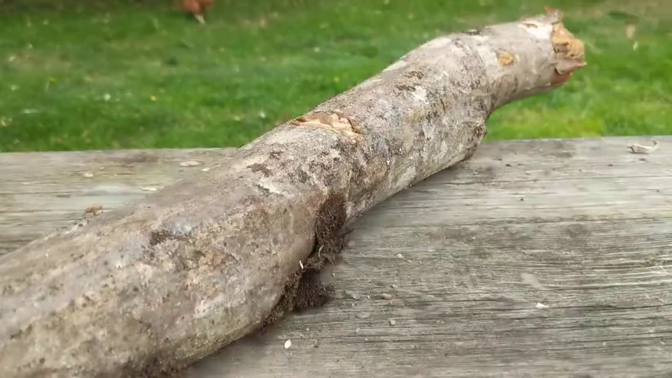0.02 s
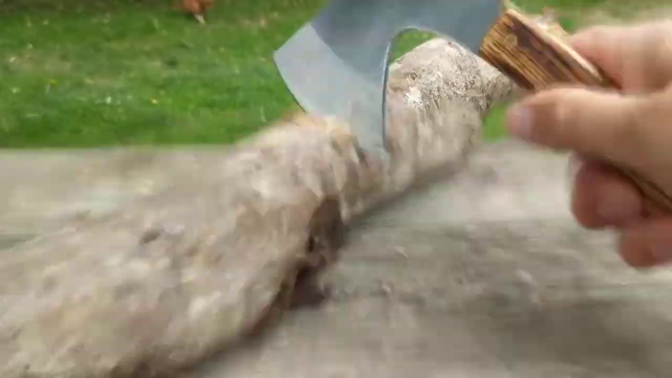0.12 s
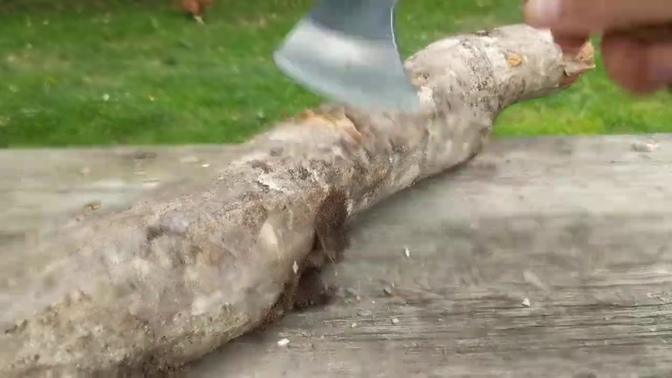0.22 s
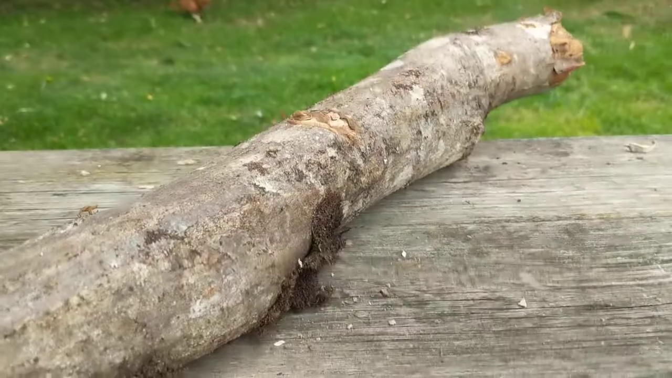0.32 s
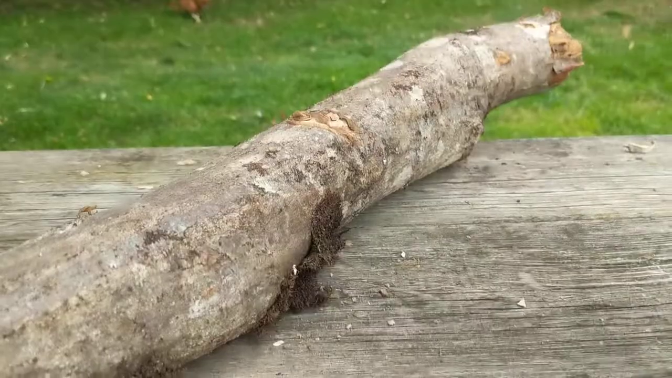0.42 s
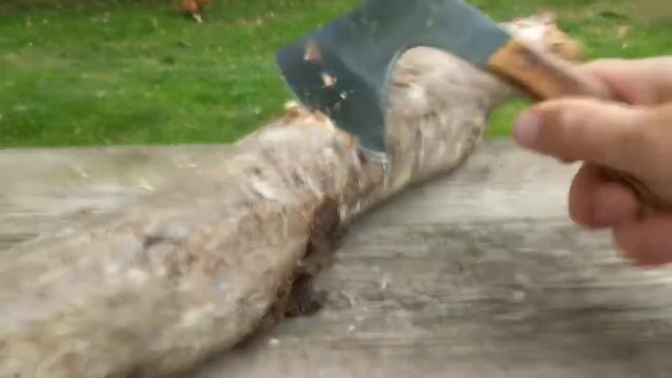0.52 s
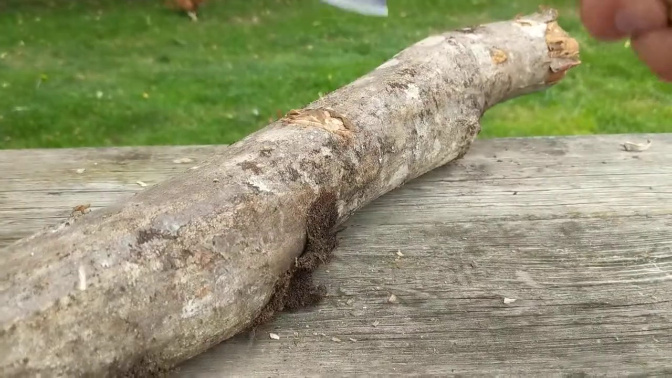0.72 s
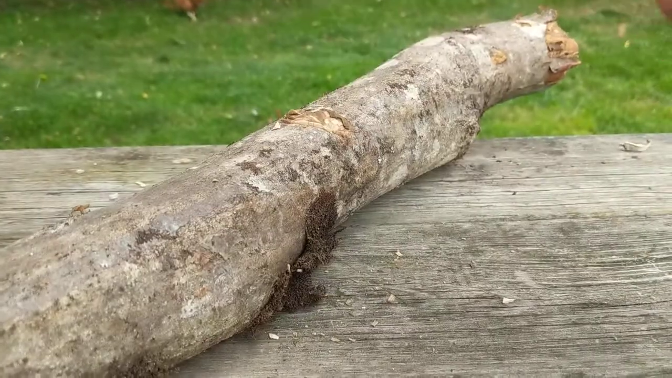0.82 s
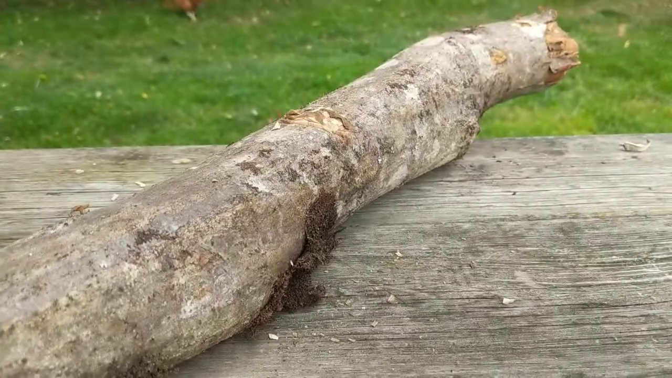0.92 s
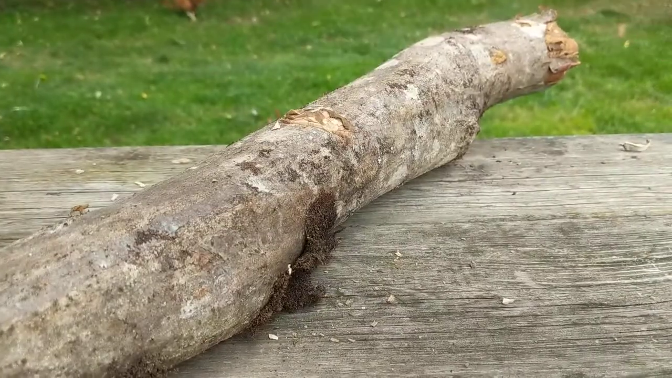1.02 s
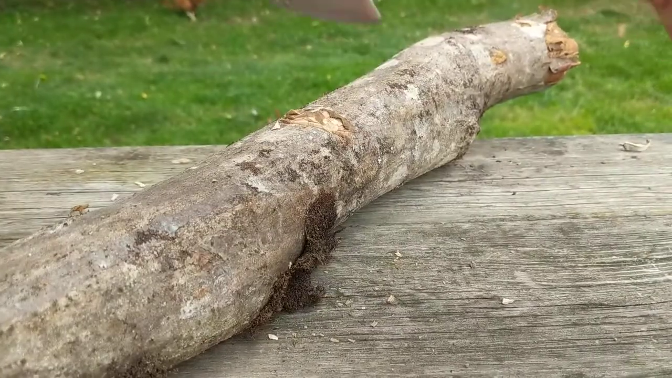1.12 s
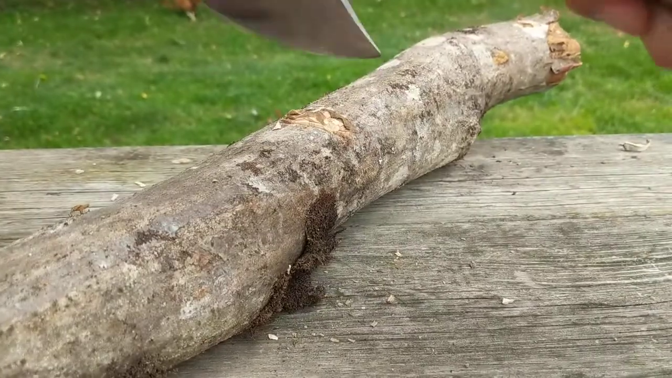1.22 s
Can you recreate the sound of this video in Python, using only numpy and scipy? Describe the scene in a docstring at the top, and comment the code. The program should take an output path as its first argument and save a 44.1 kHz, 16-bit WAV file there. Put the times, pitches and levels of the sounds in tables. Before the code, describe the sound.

Two hard hatchet chops crack a branch lying on garden planks, with small rattles after each.

```python
"""A low rumble fades under quiet outdoor air, a dry tick sounds, then a hatchet chops twice into a branch
lying on a wooden bench. Shaped noise cracks the bark; damped modes ring blade and branch and thump the bench.
The branch knocks and rattles as it settles, chips skitter and faint dry ticks go on.
The garden scatters the blows back as decaying noise, all heard at one close microphone."""
import sys
import numpy as np
from scipy import signal
from scipy.fft import rfft, irfft, next_fast_len
from scipy.io import wavfile
from scipy.ndimage import map_coordinates

SR = 44100
rng = np.random.default_rng(int(sys.argv[2]) if len(sys.argv) > 2 else 0)


def pcm_store(signal):
    """Save signal as 16-bit PCM."""
    levels = np.round(np.clip(np.atleast_2d(signal), -1, 1) * 32767)
    wavfile.write(sys.argv[1], SR, levels.astype(np.int16).T)


N = 57330

# The two blows. Each row: start in seconds, bench level in dB, relative crack level in dB,
# crack tilt in dB per octave, time for the blade to bite in seconds, low-mid weight in dB.
CHOP_ROWS = [(0.2006, -.5, 0, -1.5, .0007, 2), (0.5808, 0.5, 3, -2.5, .0014, -6.5)]
# Modes of branch and bench. Each row: frequency in Hz, relative level in dB, undamped-contact t60 in seconds.
BENCH_MODES = [(83.3, -24, 0.2), (112, -35, 0.65), (133.3, -17, 0.079), (159.55, -21, 0.19),
               (213.1, -22.5, 0.17), (266.3, -15, 0.095), (318, -31.5, 0.29), (395, -26, 0.04),
               (463.6, -20.5, 0.09), (524, -24, 0.059), (577.2, -19, 0.11), (674.4, -19, 0.08),
               (770, -12.5, 0.078), (873, -16, 0.055), (935, -18, 0.031), (1007.7, -13, 0.043)]
# Colour of a bright dry click. Each row: frequency in Hz, relative level in dB per Hz.
CLICK_COLOUR = [(500, -15), (5500, -6), (7200, 7), (8400, 11.5), (9500, 2), (11000, -22), (16000, -35)]

# Time constants of the onsets, in seconds
BENCH_RISE_S, SHARP_RISE_S, RATTLE_RISE_S, GARDEN_RISE_S = 0.00086, 0.0004, 0.0011, 0.0089
# Random level changes: depth in dB, knots per second
SPLINTERS = (3.5, 2600)
WAVER = (5, 220)


def amp(db):
    """Decibels to gain."""
    return 10 ** (np.asarray(db) / 20)


def along(points, hz):
    """Interpolate (Hz, value) points on a log frequency axis."""
    f, v = np.transpose(points)
    return np.interp(np.log(hz + 1), np.log(f + 1), v)


def since(s):
    """Seconds since s, zero before it."""
    return np.maximum(np.arange(N) / SR - s, 0)


def strike(t, rise, t60, hold=0):
    """Envelope of a blow: exponential rise, then decay by 60 dB per t60 once the hold is over."""
    decay = np.exp(-np.log(1000) * np.maximum(t - hold, 0) / t60)
    return (1 - np.exp(-t / rise)) * decay


def filtered(x, response):
    """Shape x by a gain that depends on frequency, with padding against wrap-around."""
    m = next_fast_len(N + SR // 4)
    gain = response(np.fft.rfftfreq(m, 1 / SR))
    return irfft(rfft(x, m) * gain, m)[..., :N]


def noise(spectrum, tilt_db=0):
    """Coloured noise of rms 1, tilted in dB per octave."""
    white = rng.standard_normal(N)
    x = filtered(white, lambda hz: amp(along(spectrum, hz) + tilt_db * np.log2(hz + 1)))
    return x / x.std()


def burst(x, decays, t, rise, hold=0):
    """Split x into overlapping bands and let each die at its own speed."""
    centres = [hz for hz, _ in decays]
    weights = np.eye(len(centres))
    bands = filtered(x, lambda hz: np.array([along(list(zip(centres, w)), hz) for w in weights]))
    return sum(band * strike(t, rise, t60, hold) for band, (_, t60) in zip(bands, decays))


def ring(modes, t, rise, damping=1):
    """Damped modes; they swing in mixed directions, so the blow spreads over a few milliseconds."""
    out = 0
    for k, (hz, db, t60) in enumerate(modes):
        direction = (-1) ** (k // 2)
        out = out + direction * amp(db) * np.sin(2 * np.pi * hz * t) * strike(t, rise, t60 * damping)
    return out


def clumps(depth_db, rate):
    """A random flutter of level, rate knots a second, that keeps the mean power."""
    knots = rng.standard_normal(int(rate * N / SR) + 2)
    gain = amp(depth_db * map_coordinates(knots, [since(0) * rate], mode="wrap"))
    return gain / np.sqrt(np.mean(gain ** 2))


def bark_crack(s, crack_db, tilt_db, bite_s):
    """Splitting bark: grainy noise that swells while the blade bites, then dies band by band."""
    # Colour of the crack. Each row: frequency in Hz, relative level in dB per Hz before the tilt.
    crack_colour = [(100, -11), (400, 4), (1000, -2), (2000, -5.5), (4500, -12), (7000, -10), (9500, -12.5),
                    (11500, -22.5), (15500, -27.5), (17000, -47)]
    # Decay of the crack. Each row: frequency in Hz, t60 in seconds.
    crack_decay = [(300, 0.0071), (1500, 0.014), (4000, 0.036), (9000, 0.032), (13000, 0.0076)]
    splinters = noise(crack_colour, tilt_db) * clumps(*SPLINTERS)
    return amp(crack_db - 14) * burst(splinters, crack_decay, since(s), bite_s, hold=0.0015 + bite_s)


def blade_ring(k, t):
    """Blade and cut wood ring in short modes; each chop lands elsewhere, so their balance differs."""
    # Each row: frequency in Hz, level in the first chop in dB, level in the second in dB, t60 in seconds.
    blade_modes = [(1503, -30, -27.5, 0.04), (1586.6, -29.5, -18, .045), (1680, -20, -29, 0.059),
                   (1797, -23.5, -11.5, 0.04), (2007, -14, -25.5, 0.02), (2343, -21, -22, 0.016),
                   (2620, -19, -27, 0.024), (3054, -9, -20, 0.019), (3750, -24, -28, 0.04),
                   (4095, -21, -38.5, 0.036), (4716, -17, -21, 0.028), (5180, -27, -11.5, 0.0099),
                   (6580, -14.5, -28, 0.014), (7660, -22.5, -33, 0.02), (8670, -27, -31, 0.028)]
    return ring([(row[0], row[1 + k], row[-1]) for row in blade_modes], t, SHARP_RISE_S)


def bench_thump(t, weight_db):
    """The blow pushes into the wood, thuds the planks, rings them and bounces the whole bench top."""
    # Dead push of the blade into the wood. Each row: frequency in Hz, level in dB before weighting,
    # t60 in seconds.
    push_modes = [(380, -10.5, 0.02), (883, -10.5, 0.015)]
    # Dense thud of the planks. Each row: frequency in Hz, relative level in dB per Hz before weighting.
    thud_colour = [(60, -26.5), (150, -9), (400, -5.5), (650, -4.5), (850, 3.5), (1030, -1), (1130, -14),
                   (1300, -16), (1500, -13), (1900, -15.5), (2500, -30.5), (6000, -54.5)]

    def weight(hz):
        """Gain in dB of the band that depends on where the branch is struck."""
        centre_hz, width_octaves = 354, 0.48
        return weight_db * np.exp(-(np.log2(hz / centre_hz) / width_octaves) ** 2)

    plank_modes = [(hz, db + weight(hz), t60) for hz, db, t60 in BENCH_MODES]
    weighted_push = [(hz, db + weight(hz), t60) for hz, db, t60 in push_modes]
    weighted_thud = [(hz, db + weight(hz)) for hz, db in thud_colour]
    thud = amp(-19.5) * noise(weighted_thud) * strike(t, SHARP_RISE_S, t60=0.065, hold=0.01)
    planks = ring(plank_modes, t, BENCH_RISE_S)
    sway = ring([(59.2, -20.5, 0.34)], t, rise=0.0094)  # Hz, dB, t60 in s
    push = ring(weighted_push, t, rise=0.0015)
    return thud - planks - sway - push


def chops():
    """The edge cracks the bark, then bites and rings blade, branch and bench."""
    out = np.zeros(N)
    for k, (s, bench_db, crack_db, tilt_db, bite_s, weight_db) in enumerate(CHOP_ROWS):
        bitten = since(s + bite_s)
        out += amp(bench_db) * bench_thump(bitten, weight_db)
        out += blade_ring(k, bitten)
        out += bark_crack(s, crack_db, tilt_db, bite_s)
    return out


def bounces():
    """The settling branch knocks back on the planks, damping them, and its bark rattles."""
    # Each row: start in seconds, knock level in dB, rattle level in dB.
    rebounds = [(.2318, -22.5, -37.5), (.297, -39, -64), (.321, -44.5, -53.5), (0.355, -32, -60.5),
                (0.6008, -22, -43), (.6125, -26.5, -39), (.644, -24.5, -54), (.664, -36, -58),
                (.689, -27, -54)]
    # Colour of the rattle. Each row: frequency in Hz, relative level in dB per Hz.
    rattle_colour = [(200, -0.5), (1750, 4.5), (3000, -11), (8000, -14), (10500, -29), (16000, -38)]
    knocks = sum(amp(db) * ring(BENCH_MODES, since(s), BENCH_RISE_S, damping=0.71) for s, db, _ in rebounds)
    shakes = sum(amp(db) * strike(since(s), RATTLE_RISE_S, t60=0.045) for s, _, db in rebounds)
    rattle = noise(rattle_colour) * shakes
    contact = signal.butter(2, [170, 415], "band", fs=SR, output="sos")  # soft contact band in Hz
    return signal.sosfilt(contact, knocks) + rattle * clumps(*SPLINTERS)


def chips():
    """Small hard chips click down and skitter in a grainy hiss with a thin, uneven ring."""
    # Landings of flying chips. Each row: start in seconds, level in dB.
    landings = [(.275, -59), (.297, -60), (.6435, -54.5), (.714, -83)]
    # Thin ring of a chip. Each row: frequency in Hz, level relative to the landing in dB.
    chip_modes = [(4480, -5), (5900, -6), (7250, -10), (7700, -21), (8400, -4), (9270, -4.5)]
    out = np.zeros(N)
    for s, db in landings:
        t = since(s)
        click = amp(6.5) * noise(CLICK_COLOUR) * strike(t, SHARP_RISE_S, t60=0.017)
        hiss = amp(-2.5) * noise(CLICK_COLOUR) * clumps(*WAVER)
        notes = sum(amp(level) * np.sin(2 * np.pi * hz * t) * clumps(*WAVER) for hz, level in chip_modes)
        out += amp(db) * (click + (hiss + notes) * strike(t, SHARP_RISE_S, t60=0.2))
    return out


def ticks():
    """Tiny dry ticks: short bursts of noise, some bright and some duller."""
    # Each row: start in seconds, level of the bright click in dB, level of its duller body in dB.
    tick_rows = [(0.103, -67, -63), (0.54, -64, -64.5), (0.3975, -55.5, -64), (0.4738, -63.5, -66),
                 (0.817, -64, -57.5), (0.9103, -50, -60), (1.087, -56.5, -67), (1.206, -67, -68),
                 (1.274, -58.5, -64)]
    # Colour of the duller body. Each row: frequency in Hz, relative level in dB per Hz.
    body_colour = [(300, -10), (2400, -13), (3600, -2.5), (4300, 4), (5200, -9), (9000, -31)]
    click, body = noise(CLICK_COLOUR), noise(body_colour)
    out = np.zeros(N)
    for s, click_db, body_db in tick_rows:
        mix = amp(click_db) * click + amp(body_db) * body
        out += mix * strike(since(s), SHARP_RISE_S, t60=0.018)
    return out


def near_scatter(s):
    """Near surfaces return a grainy tail that drops away fast beyond their reach."""
    # Colour of the scatter. Each row: frequency in Hz, relative level in dB per Hz.
    scatter_colour = [(100, -6.5), (300, 8), (900, 2.5), (1800, -7.5), (2600, -12), (5000, -14),
                      (9000, -15.5), (10500, -30.5), (15000, -47.5)]
    # Decay of the scatter within reach. Each row: frequency in Hz, t60 in seconds.
    scatter_decay = [(300, 0.51), (1000, 0.33), (3000, 0.48), (9000, 0.21)]
    reach_s, beyond_db_per_s = 0.14, 343
    tail = burst(noise(scatter_colour), scatter_decay, since(s), GARDEN_RISE_S) * clumps(2.8, 220)
    return amp(-37.3 - beyond_db_per_s * since(s + reach_s)) * tail


def lingering_bass(s):
    """The bass of a chop lingers in the garden as slowly wavering low noise."""
    # Colour of the bass. Each row: frequency in Hz, relative level in dB per Hz.
    boom_colour = [(25, -35), (45, -8), (60, 1.5), (110, 2), (150, 0.5), (220, -11.5), (350, -38),
                   (1000, -60.5)]
    # Decay of the bass. Each row: frequency in Hz, t60 in seconds.
    boom_decay = [(90, .73), (190, .42)]
    boom = burst(noise(boom_colour), boom_decay, since(s), GARDEN_RISE_S)
    return amp(-36.5) * boom * clumps(2, 25)


def hollow_note(s):
    """A small hollow note, one wavering damped mode, follows a chop."""
    # Each row: frequency in Hz, level in dB, t60 in seconds.
    note_modes = [(1000, -63, 0.14)]
    delay_s = 0.43
    return ring(note_modes, since(s + delay_s), RATTLE_RISE_S) * clumps(*WAVER)


def far_wall(s):
    """A far wall answers a chop with one faint, delayed burst of noise."""
    # Colour of the echo. Each row: frequency in Hz, relative level in dB per Hz.
    echo_colour = [(100, 7), (400, -14.5), (980, -4), (1750, -2.5), (2600, -21), (8000, -36.5)]
    delay_s = 0.197
    return amp(-67.5) * noise(echo_colour) * strike(since(s + delay_s), GARDEN_RISE_S, t60=0.2, hold=0.03)


def garden():
    """The garden's answers to each chop, from near scatter to far wall."""
    out = np.zeros(N)
    for s, *_ in CHOP_ROWS:
        out += near_scatter(s) + lingering_bass(s) + hollow_note(s) + far_wall(s)
    return out


def air():
    """Steady coloured noise for the quiet outdoors, and a low rumble dying away from the start."""
    # Colour of the outdoor background. Each row: frequency in Hz, relative level in dB per Hz.
    air_colour = [(20, -2.5), (91, 3), (150, -13), (273, -12.5), (404, -18), (520, -13.5), (729, -18.5),
                  (1080, -18.5), (2970, -25), (8500, -33.5), (15200, -37.5), (16500, -49.5)]
    # Colour of the low rumble. Each row: frequency in Hz, relative level in dB per Hz.
    rumble_colour = [(30, -20), (55, -3.5), (105, 1), (150, -9), (300, -28.5), (1000, -29.5), (3000, -51)]
    background = amp(-65.5) * noise(air_colour)
    rumble = amp(-49) * noise(rumble_colour) * strike(since(0), SHARP_RISE_S, t60=0.51)
    return background + rumble


def scene():
    """Everything at one close microphone."""
    return (chops() + bounces() + chips() + ticks() + garden() + air())[None]


def record(dry):
    """The recorder drops deep bass, rounds off the highest peaks and falls steeply above its band limit."""
    low_cut_hz, top_hz = 35, 16500
    ceiling, hardness = 0.72, 11  # full scale is 1; a harder knee bends later
    thin = signal.sosfilt(signal.butter(4, low_cut_hz, "high", fs=SR, output="sos"), dry)
    clipped = thin / (1 + np.abs(thin / ceiling) ** hardness) ** (1 / hardness)
    return filtered(clipped, lambda hz: 1 / (1 + (hz / top_hz) ** 80))


dry = scene()
out = record(dry)
pcm_store(out)
```